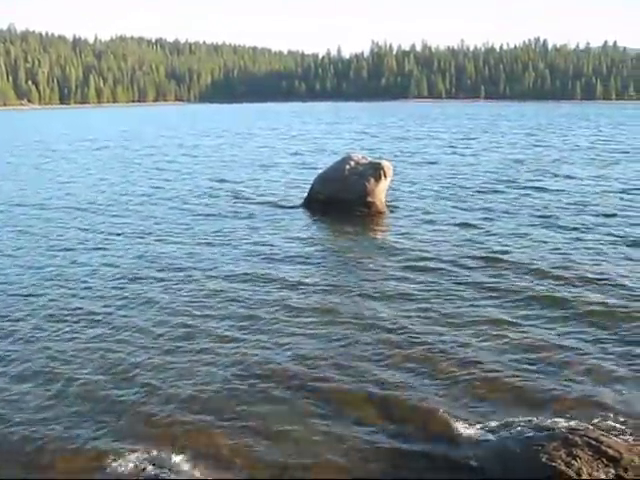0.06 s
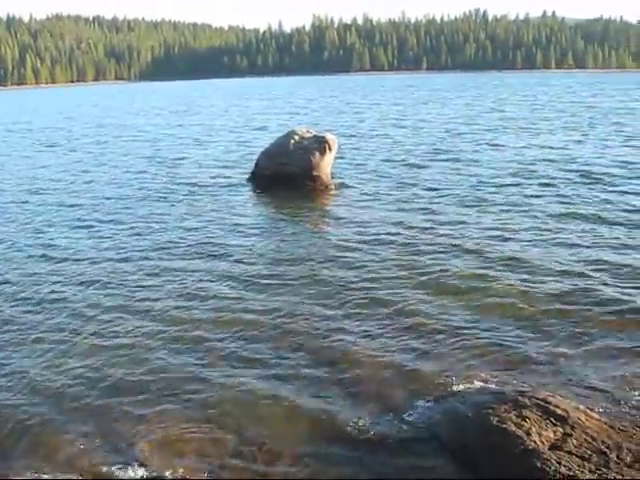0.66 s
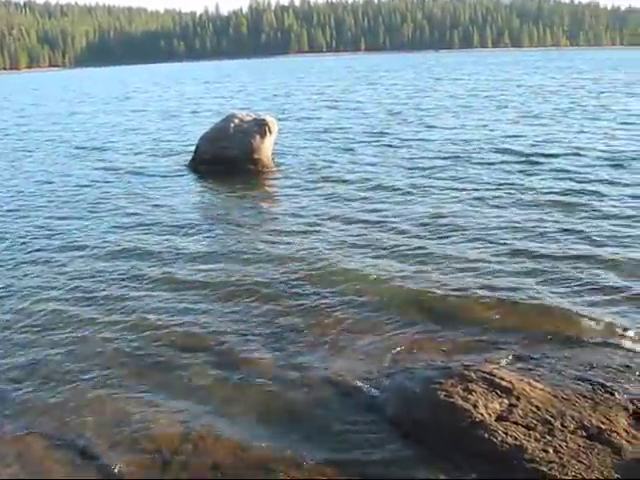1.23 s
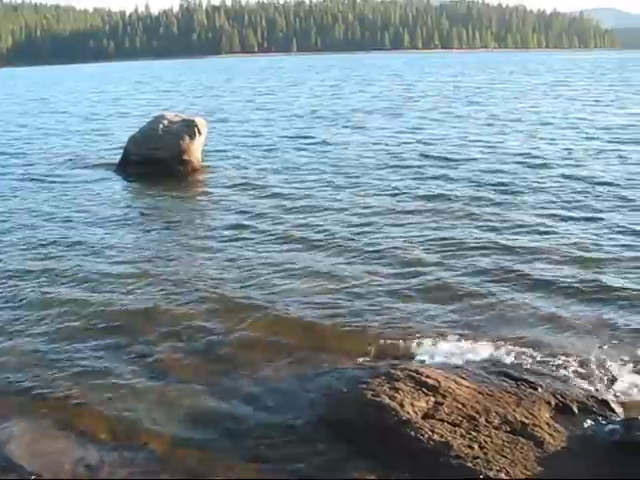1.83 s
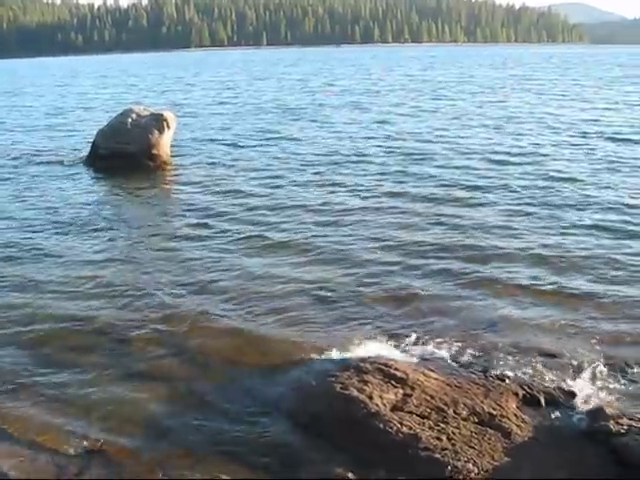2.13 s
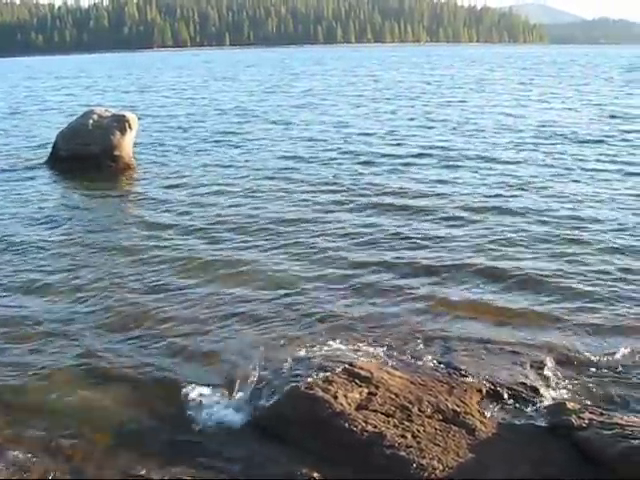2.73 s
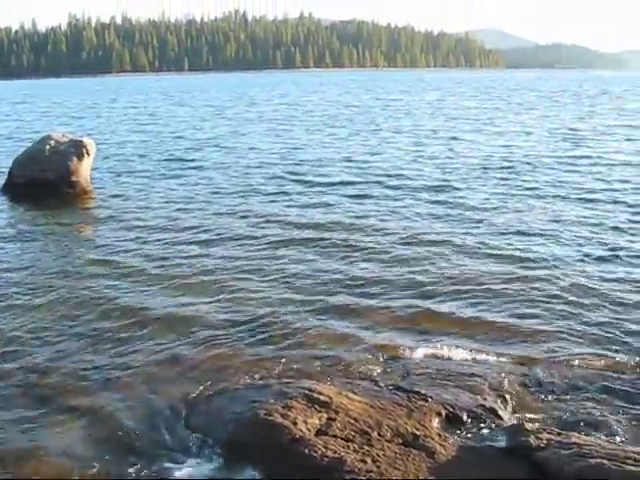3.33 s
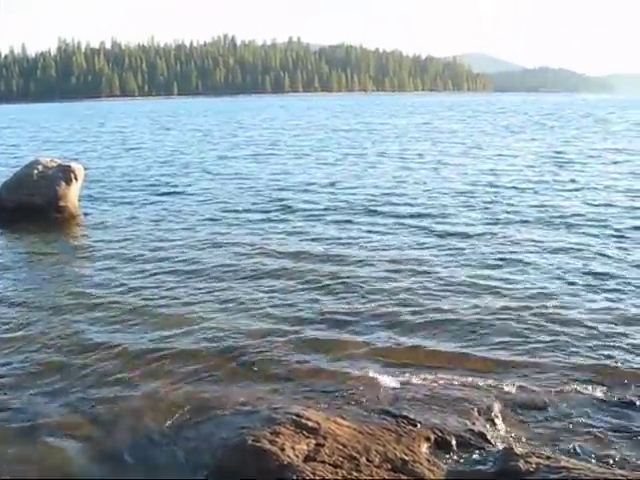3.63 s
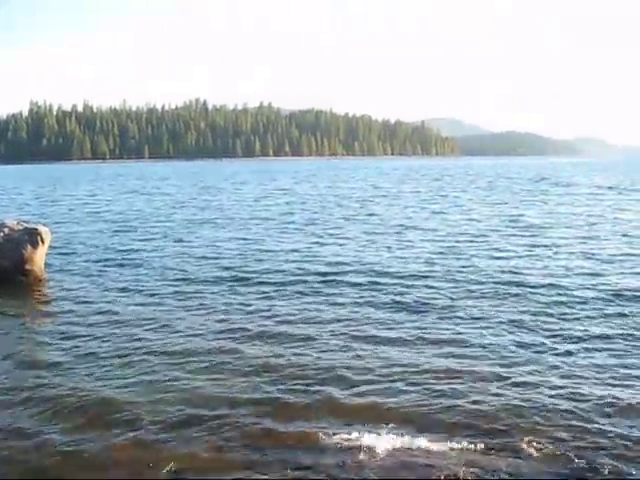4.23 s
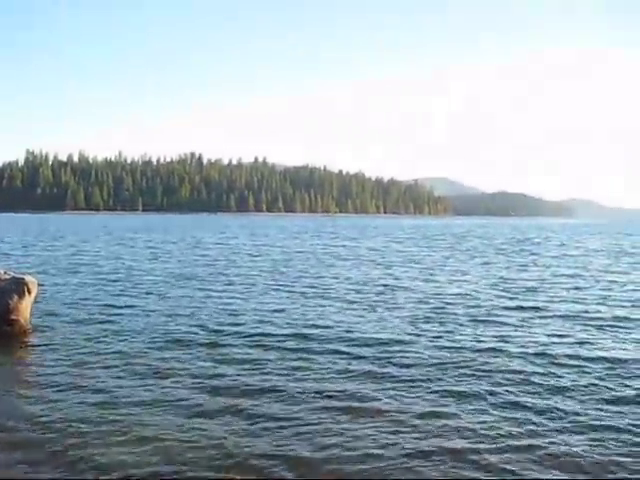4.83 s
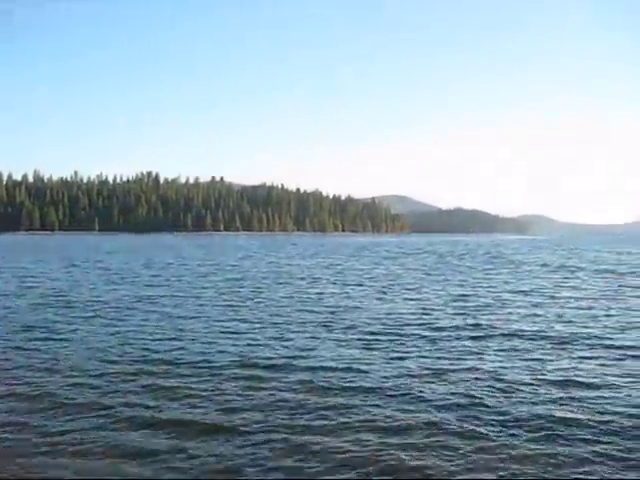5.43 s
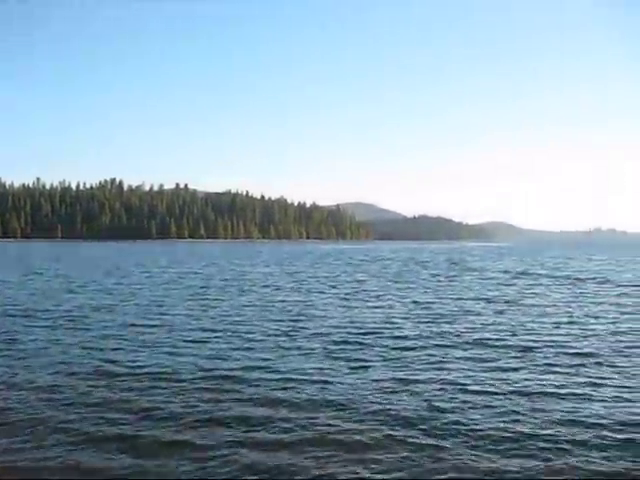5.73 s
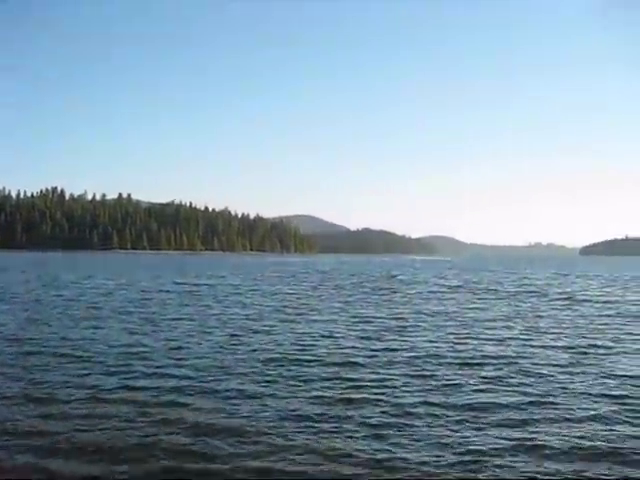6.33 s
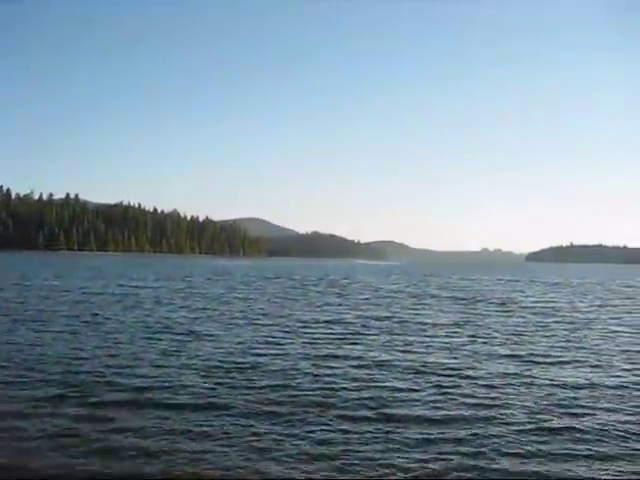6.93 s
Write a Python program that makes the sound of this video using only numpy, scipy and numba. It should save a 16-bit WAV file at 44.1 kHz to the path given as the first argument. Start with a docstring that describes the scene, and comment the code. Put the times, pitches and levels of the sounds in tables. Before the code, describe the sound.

Small waves lap and gurgle against lakeshore rocks, close by, while a strong gust of wind buffets the microphone midway.

```python
"""Small waves on the rocks of a lake shore, heard close by on a hand-held camera's microphone.
From the start the water washes in as a crowd of bubbles and droplets, gurgling and ringing a rock gap.
Wind eddies thump on the microphone, singly at first, then in one long gust from 3 s to 4.5 s,
and the camera's limiter ducks the water under every strong buffet. Sharp clicks bunch near 4.7 s;
after that the wind eases and the waves lap on more softly."""
import sys
import numpy as np
from scipy import signal
from scipy.fft import rfft, irfft, next_fast_len
from scipy.io import wavfile
from scipy.ndimage import uniform_filter1d, minimum_filter1d
from numba import njit

SR = 44100
rng = np.random.default_rng(int(sys.argv[2]) if len(sys.argv) > 2 else 0)


def int16_out(signal):
    """Quantize to a 16-bit WAV file."""
    q = np.round(np.clip(np.atleast_2d(signal).T, -1, 1) * 32767)
    wavfile.write(sys.argv[1], SR, q.astype(np.int16))


N = 316197
TIME = np.arange(N) / SR


# Tone of the water from the shore: frequency_hz, gain_db
WATER_SPECTRUM = [(25, -16.5), (80, -16), (190, -7.5), (380, -4), (600, -5), (850, -3), (1150, 1),
                  (1550, -5), (2000, -1.5), (3200, -1), (5500, -6.5), (7200, -13), (10500, -13.5),
                  (15500, -15.5)]
def whitewater():
    """Foam hiss, gurgling bubbles, fizz and droplets, blended into one steady wash."""
    foam = undb(-2.5) * rng.standard_normal(N)
    gurgle = undb(-5) * bubbles(304, 2567, cycles=13.3, spread_db=4, glide=0.12, count=4000)
    fizz = undb(-4) * bubbles(1430, 16900, cycles=18.4, spread_db=3.5, glide=0.028, count=14000)
    drops = undb(-12) * bubbles(2470, 14700, cycles=9.6, spread_db=4, glide=0., count=1500)
    return colour(foam + gurgle + fizz + drops, WATER_SPECTRUM)


# Waves breaking on the nearest rocks: crest_s, spray_db, churn_db, drain_s
WAVES = [(.06, -30.5, -36, 0.13), (.45, -32, -34.5, 0.23), (.7, -33, -32, 0.17), (1.02, -25.5, -39, 0.64),
         (1.45, -29, -38, 0.36), (1.62, -28.5, -34.5, 0.38), (1.93, -25.5, -28, 0.092),
         (2.33, -26, -32.5, 0.69), (2.85, -35, -32, 0.068), (3.95, -25, -22.5, 0.088),
         (4.39, -25.5, -27.5, 0.095), (4.98, -28, -31.5, 0.8), (5.25, -35, -31.5, 0.071),
         (6.03, -34, -38, 0.069), (6.4, -37, -40, 0.49), (6.8, -37, -46, 0.084), (7.05, -35, -36, 0.68)]
def waves(churn_lag_s=0.014):
    """Each wave sprays, then churns; ripples lap between, and a deep slosh runs all along the shore."""
    water = whitewater()
    slosh = unit(passband(water, 590, "low", order=4))
    churn = unit(passband(water, [650, 1750], "band", order=4))
    spray = unit(passband(water, 1892, "high", order=5))
    crest_s, spray_db, churn_db, drain_s = np.transpose(WAVES)
    churn_swell_db = swell_db(crest_s + churn_lag_s, churn_db, drain_s, lapping_db=-34.5) - 0.82
    spray_swell_db = swell_db(crest_s, spray_db, drain_s, lapping_db=-31.5) - 1
    surge_db = 0.9 * wander(70) + 0.65 * wander(14)  # churn and spray surge together
    churn *= undb(churn_swell_db + surge_db + 1.17 * wander(70))
    spray *= undb(spray_swell_db + surge_db + 1.17 * wander(200))
    slosh *= undb(-40 + wander(7.4))
    return slosh + churn + spray


def swell_db(crests_s, levels_db, drains_s, lapping_db, rise_s=0.068):
    """Level of water that rises quickly to each crest and drains away, over a steady lapping."""
    power = undb(lapping_db) ** 2
    for crest_s, level_db, drain_s in zip(crests_s, levels_db, drains_s):
        age = TIME - crest_s
        envelope = np.exp(-np.where(age < 0, (age / rise_s) ** 2, age / drain_s))
        power = power + undb(level_db) ** 2 * envelope
    return 10 * np.log10(power)


def bubbles(low_hz, high_hz, cycles, spread_db, glide, count):
    """A crowd of ringing bubbles, many faint and a few strong, with an even spectrum."""
    start_fraction, pitch, life, rank = rng.random((count, 4)).T
    pitch_hz = low_hz * (high_hz / low_hz) ** pitch
    size = undb(-spread_db * np.log(np.maximum(rank, .01))) * pitch_hz
    crowd = ring_bubbles(start_fraction, pitch_hz, cycles * (.5 + life), size, glide)
    return unit(crowd) * np.sqrt(2 * (high_hz - low_hz) / SR)  # as strong per Hz as unit white noise


@njit
def ring_bubbles(start_fraction, pitch_hz, cycles, size, glide):
    """Decaying sines whose pitch climbs by the fraction glide as each bubble nears the surface."""
    out = np.zeros(N)
    for k in range(len(start_fraction)):
        first = int(start_fraction[k] * N)
        length = int(cycles[k] * SR / pitch_hz[k]) + 2
        phase = 0.
        for i in range(min(length, N - first)):
            age = i / length
            phase += 2 * np.pi * pitch_hz[k] * (1 + glide * age) / SR
            out[first + i] += size[k] * np.exp(-5 * age) * np.sin(phase)
    return out


# Single bubbles among the near rocks: start_s, peak_db, start_pitch_hz
GURGLES = [(1.062, -19, 2150), (1.208, -12, 2940), (1.267, -14.5, 1110), (1.344, -13, 1980),
           (2.275, -20, 968), (2.34, -12, 3140), (2.473, -16, 1850), (2.625, -18.5, 820),
           (4.403, -12, 1760), (4.713, -7.5, 3250), (5.848, -17, 1510), (6.041, -27, 457),
           (6.065, -25, 610), (6.08, -21, 863), (6.094, -15, 3440), (6.193, -18.5, 960), (6.419, -17, 3310),
           (6.849, -23, 890), (6.9, -21, 1090), (7.012, -18, 860)]
def gurgles(cycles=27.6):
    """Trapped pockets of air ring briefly and rise in pitch."""
    start_s, peak_db, pitch_hz = np.transpose(GURGLES)
    lifetimes = np.full(len(pitch_hz), cycles)
    return ring_bubbles(start_s * SR / N, pitch_hz, lifetimes, undb(peak_db), glide=0.16)


# Resonances of a gap between the rocks: pitch_hz, width_hz, gain_db
GAP_MODES = [(948, 300, 3), (1927, 280, 2.5), (2690, 350, -14)]
# Water running into that gap: crest_s, level_db
GAP_SURGES = [(.03, -34), (1.08, -30.5), (1.28, -29), (1.44, -31), (1.64, -31.5), (2.28, -37), (2.6, -33.5)]
def rock_gap(drain_s=0.093):
    """Churning water rings the air in the gap, then drains to a trickle."""
    churn = rng.standard_normal(N)
    ringing = sum(undb(gain_db) * passband(churn, [hz - width / 2, hz + width / 2], "band")
                  for hz, width, gain_db in GAP_MODES)
    crest_s, level_db = np.transpose(GAP_SURGES)
    filling_db = swell_db(crest_s, level_db, np.full(len(crest_s), drain_s), lapping_db=-41)
    return unit(ringing) * undb(filling_db + 2 * wander(50))


# The strongest eddies, right on the microphone: time_s, level_db, pitch_hz
BUFFETS = [(0.32, -5, 295), (0.376, 6.5, 353), (.401, -12, 330), (2.492, 8.5, 550), (2.517, 5, 635),
           (3.039, 3.5, 390), (3.137, 2, 503), (3.158, 13, 420), (3.245, 9.5, 416), (3.281, 13, 590),
           (3.34, 7, 360), (3.393, 2, 447), (3.457, 8.5, 360), (3.491, 7.5, 556), (3.512, 12, 360),
           (3.533, 10.5, 432), (3.574, 11.5, 630), (3.621, 0, 540), (3.643, 12.5, 490), (3.744, 8, 517),
           (3.792, 8.5, 404), (3.878, 8, 460), (3.977, 9.5, 496), (4.007, 14, 426), (4.104, 13, 520),
           (4.146, 7, 560), (4.268, 1.5, 500), (4.299, 8, 494), (4.43, 11.5, 460), (4.484, 8, 328),
           (4.505, 11, 373), (4.525, 7.5, 560), (4.605, -2.5, 433), (4.678, -3.5, 480), (4.811, 3, 400),
           (4.935, -13, 350), (4.977, -5.5, 360), (5.04, -16, 298), (5.097, -11.5, 412), (5.194, -7.5, 290),
           (5.21, -5, 357), (5.338, -11.5, 340), (5.528, -15.5, 300), (5.551, -12, 413), (5.662, -12, 430),
           (5.675, -8, 388), (5.792, -12, 347), (5.936, -12.5, 286), (6.009, -14.5, 480)]
def buffets(wake_s=0.0099, companion_gap_s=0.00535):
    """Each eddy thumps between two weaker companions and leaves a short turbulent wake."""
    out = np.zeros(N)
    t = np.arange(-662, 2205) / SR
    for time_s, level_db, hz in BUFFETS:
        phase = rng.uniform(0, 2 * np.pi, size=4)
        lead_s, lag_s = companion_gap_s * (.5 + rng.random(2))
        thump = eddy(t, hz, phase[0])
        thump /= np.abs(thump).max()
        snap = undb(-15 + level_db / 2) * eddy(t, 2 * hz, phase[3])  # harder blows have sharper edges
        companions = eddy(t + lead_s, 0.54 * hz, phase[1]) + eddy(t - lag_s, 0.82 * hz, phase[2])
        wake = unit(passband(rng.standard_normal(len(t)), [130, 1.2 * hz], "band", order=3))
        wake *= np.exp(-np.maximum(t, -3 * t) / wake_s)
        blow = thump + snap + undb(-13) * companions + undb(-22) * wake
        add(out, time_s + t[0], undb(level_db) * blow)
    return passband(out, 53, "high", order=1)


# Gusts across the microphone: start_s, hold_s, level_db, fade_db_per_s
GUSTS = [(0, 0.14, -36.5, 150), (0.468, 0.077, -35.5, 35), (2.462, 0.034, -30, 206),
         (2.618, 0.091, -32, 90), (3.055, 0.033, -14, 30), (3.2, 1.3, -11, 104), (4.625, 0.037, -16, 78),
         (4.784, 0.059, -16, 84), (5.19, 0.015, -24, 132), (5.934, 0.076, -33.5, 160)]
def gusts(eddy_hz=330, eddy_count=2300, rise_db_per_s=320):
    """A lumpy rumble and an uneven train of eddies; each gust rises fast, holds and dies away."""
    lumpy_noise = undb(3 * wander(120)) * rng.standard_normal(N)
    rumble = unit(passband(lumpy_noise, [75, 290], "band"))
    flutter = np.zeros(N)
    t = np.arange(-441, 441) / SR
    starts_s = rng.random(eddy_count) * N / SR
    phases = rng.uniform(0, 2 * np.pi, eddy_count)
    forces, scatters = np.clip(rng.standard_normal((eddy_count, 2)), -2, 2).T
    for start_s, phase, force, scatter in zip(starts_s, phases, forces, scatters):
        hz = eddy_hz * np.exp(np.tanh(0.35 * scatter + 0.3 * force))  # stronger eddies are faster
        add(flutter, start_s, undb(4 * force) * eddy(t, hz, phase))
    wind = passband(undb(-4) * rumble + undb(-1) * unit(flutter), 33, "high", order=1)
    strongest_db = np.full(N, -np.inf)
    for start_s, hold_s, level_db, fade_db_per_s in GUSTS:
        rise_db = rise_db_per_s * np.maximum(start_s - TIME, 0)
        fade_db = fade_db_per_s * np.maximum(TIME - start_s - hold_s, 0)
        strongest_db = np.maximum(strongest_db, level_db - rise_db - fade_db)
    return wind * undb(strongest_db)


def eddy(t, hz, phase):
    """A passing eddy swings the pressure one way and back."""
    turn = 2 * np.pi * hz * t
    return np.exp(-(turn / 2.4) ** 2) * np.sin(turn + phase)


# Handling of the camera and flung drops: start_s, peak_db, centre_hz, decay_s
CLICKS = [(.144, -11.5, 3320, .0044), (.3928, -9, 13300, 0.00031), (.4325, -23, 12500, .002),
          (1.207, 1, 4500, 0.00068), (1.791, -16, 6000, 0.00084), (2.886, -12.5, 2800, 0.0056),
          (4.709, -11, 4500, .0022), (4.714, -6, 11900, .0006), (4.722, -14.5, 11000, 0.012),
          (4.7265, -3.5, 3240, .0015), (4.735, -11.5, 4080, 0.0074), (4.75, -13, 6040, 0.003),
          (5.115, -15, 5630, .0024), (5.338, -10, 9050, 0.00066), (6.089, -15, 10400, 0.0021),
          (6.358, -24, 12000, 0.0026), (6.425, -12, 5170, 0.0013), (7.039, -14.5, 5970, .0012)]
def clicks():
    """Small impacts make dry cracks of noise that die within milliseconds."""
    out = np.zeros(N)
    t = np.arange(2205) / SR
    for start_s, peak_db, centre_hz, decay_s in CLICKS:
        burst = rng.standard_normal(len(t)) * np.exp(-t / decay_s)
        crack = passband(burst, [0.54 * centre_hz, 1.49 * centre_hz], "band", order=3)
        add(out, start_s, undb(peak_db) * crack / np.abs(crack).max())
    return out


# Light air at the microphone: time_s, level_db
BREEZE = [(0, -42), (.25, -41), (.8, -38.5), (1.4, -44.5), (1.9, -39), (2.3, -47), (2.65, -41.5),
          (5.1, -44), (5.9, -42), (6.25, -41), (6.5, -51), (7.17, -50)]
def breeze():
    """Air that never stops moving makes a soft, deep rumble."""
    rumble = unit(passband(rng.standard_normal(N), [22, 110], "band"))
    level_db = np.interp(TIME, *np.transpose(BREEZE)) - 1
    return rumble * undb(level_db + 0.18 * wander(10))


def ticks():
    """Sparse, tiny bubbles tick faintly in the top octave."""
    return undb(-51) * bubbles(9000, 15500, cycles=14, spread_db=5, glide=0., count=120)


def undb(db):
    """Decibels to gain."""
    return 10 ** (np.asarray(db) / 20)


def unit(x):
    """Scale to rms 1."""
    return x / np.sqrt(np.mean(x ** 2))


def wander(rate_hz):
    """Smooth random wandering with rms 1."""
    knots = np.convolve(rng.standard_normal(8000), [.5, 1, .5], "same")
    return unit(np.interp(TIME * rate_hz, np.arange(len(knots)), knots))


def colour(x, points):
    """Shape a spectrum with (frequency_hz, gain_db) points."""
    hz, db = np.transpose(points)
    size = next_fast_len(N)
    log_hz = np.log(np.fft.rfftfreq(size, 1 / SR) + 1)
    gain = undb(np.interp(log_hz, np.log(hz), db))
    return irfft(rfft(x, size) * gain, size)[:N]


def passband(x, hz, kind, order=2):
    """Butterworth filter."""
    return signal.sosfilt(signal.butter(order, hz, kind, fs=SR, output="sos"), x)


def add(out, start_s, sound):
    """Mix a short sound in at its start time."""
    i = max(int(start_s * SR), 0)
    out[i:i + len(sound)] += sound[:max(N - i, 0)]


def scene():
    """Water, wind and clicks at one small microphone that loses the deepest bass."""
    shore = waves() + rock_gap() + gurgles() + ticks()
    air = breeze() + gusts() + buffets()
    return passband(shore + air + clicks(), 29, "high", order=1)[None]


def gain_control(x, average_s=0.023, threshold_db=-18.5, cut_db_per_db=0.36):
    """The camera turns down sound that stays loud, and the water with it."""
    keep = np.exp(-1 / (average_s * SR))
    loudness = np.sqrt(signal.lfilter([1 - keep], [1, -keep], x[0] ** 2))
    return x / np.maximum(1, loudness / undb(threshold_db)) ** cut_db_per_db


@njit
def peak_hold(size, release):
    """Follow peaks at once and let go exponentially."""
    out, held = np.empty(len(size)), 0.
    for i in range(len(size)):
        held = max(size[i], held * release)
        out[i] = held
    return out


def limiter(x, ceiling=0.97, release_s=0.034):
    """The camera's fast limiter ducks everything under the tallest peaks."""
    held = peak_hold(np.abs(x[0]), np.exp(-1 / (release_s * SR)))
    gain = np.minimum(1, ceiling / (held + 1e-9))
    smooth_gain = uniform_filter1d(minimum_filter1d(gain, size=31), size=31)
    return np.clip(x * smooth_gain, -1, 1)


def record(dry, notch_hz=7900, top_hz=15800):
    """Inside the camera: gain control, limiter, a narrow treble notch and a steep cut at the top."""
    sound = limiter(gain_control(dry))
    for q in (9, 14):
        sound = signal.lfilter(*signal.iirnotch(notch_hz, q, fs=SR), sound)
    return signal.sosfilt(signal.ellip(10, .2, 70, top_hz, fs=SR, output="sos"), sound)


dry = scene()
out = record(dry)
int16_out(out)
```